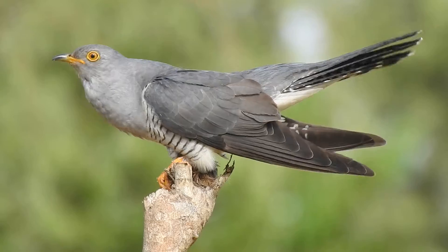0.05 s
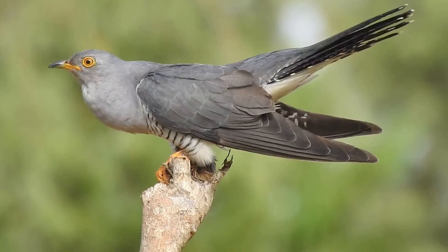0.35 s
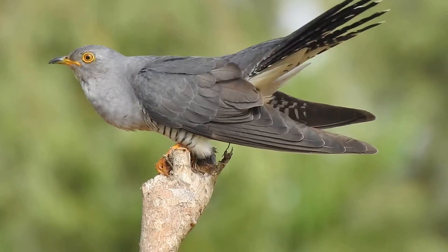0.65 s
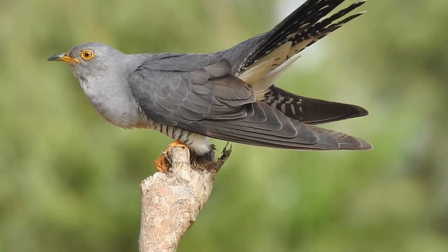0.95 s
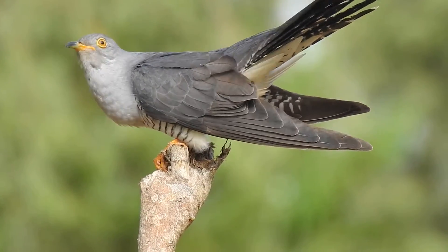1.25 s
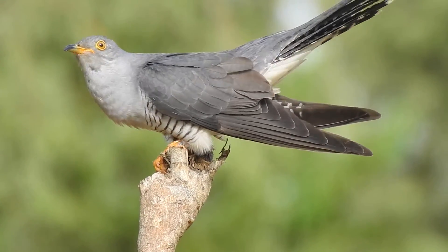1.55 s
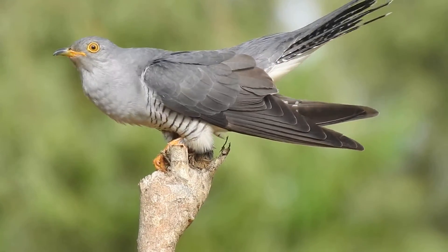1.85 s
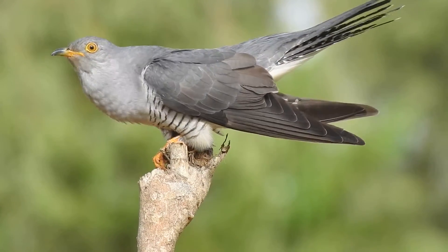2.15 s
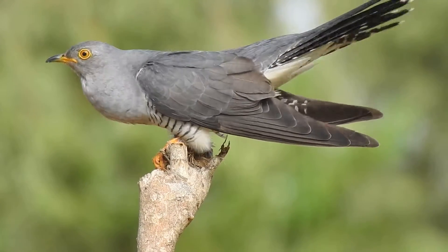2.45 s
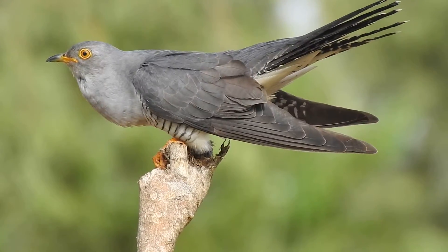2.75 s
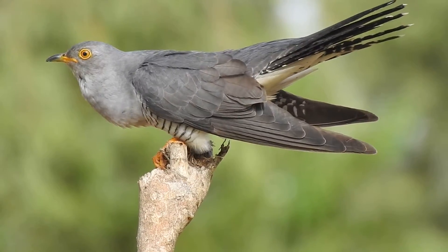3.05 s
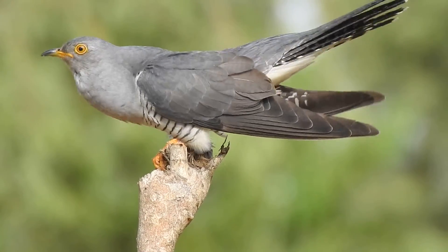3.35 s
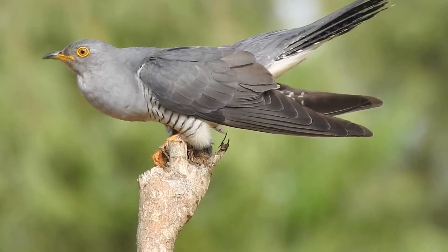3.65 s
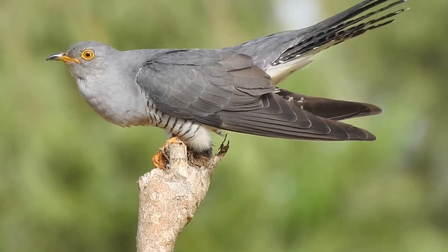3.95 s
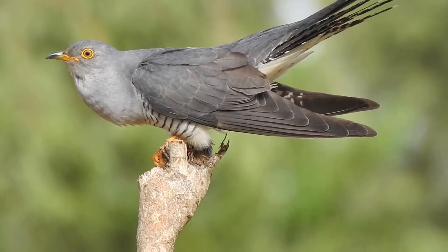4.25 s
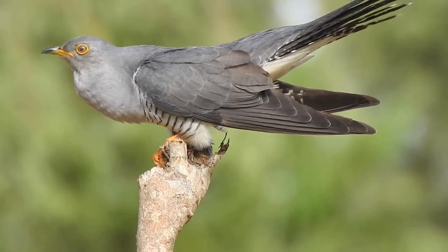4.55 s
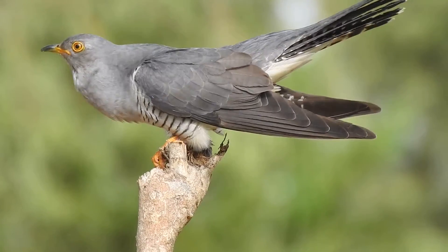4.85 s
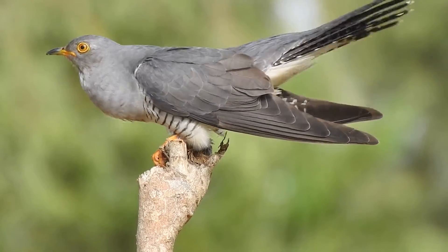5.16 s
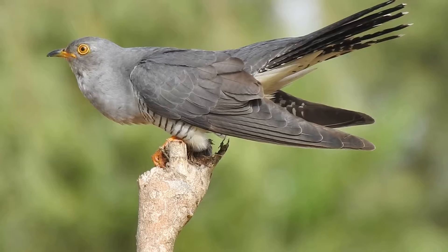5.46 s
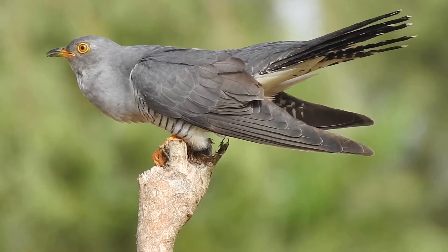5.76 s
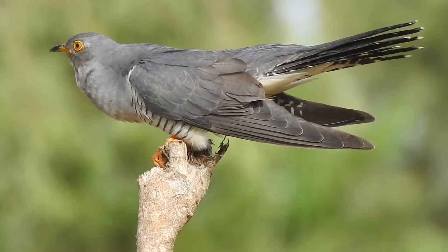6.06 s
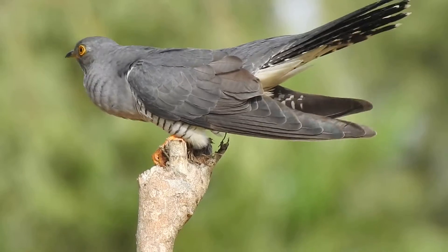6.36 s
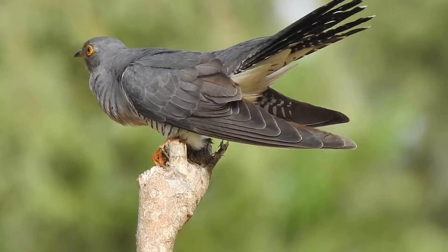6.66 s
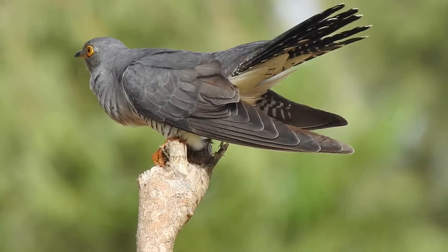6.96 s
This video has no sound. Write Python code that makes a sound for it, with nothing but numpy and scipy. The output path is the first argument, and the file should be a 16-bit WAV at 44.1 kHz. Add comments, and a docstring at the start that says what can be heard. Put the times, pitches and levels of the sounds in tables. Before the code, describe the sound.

A cuckoo calls nearby in open scrub, over a faint hiss of leaves and distant twittering. Each call is two pure, hollow notes, a short arched one and then a longer, lower one, with a light outdoor echo. The first comes right at the start, followed by a few faint fluty notes from a distant bird. Wind bumps the microphone and builds into one hard gust from about 1.5 to 2.2 seconds, with loud low rumble, a hollow rush and brief crackle. It then eases to light rumble, with another puff near 3.5 seconds. The cuckoo calls again at about 2.1, 3.4, 4.7 and 6 seconds, clear and evenly paced. Farther off, small birds give thin whistles from 2 seconds on, sharp chirps near 4, 5.2 and 6.5 seconds, and a run of soft paired cheeps from 5.5 seconds until the end, just after 7 seconds.

```python
"""Open scrub: leaves hiss, far birds twitter, and wind turbulence buffets the two microphone ports.
At 0.1 s a cuckoo calls from a stump: a short arched note, then a longer, lower one, both near sines
from the syrinx. A few fluty notes follow. At 1.5-2 s one hard gust rushes, crackles and rings the ports.
From 2 s the wind eases and the cuckoo calls four more times, echoing off the bushes, while small
birds whistle, chirp and cheep farther off."""
import sys
import numpy as np
from scipy import signal
from scipy.fft import rfft, irfft, next_fast_len
from scipy.io import wavfile
from scipy.ndimage import uniform_filter1d

SR = 44100
rng = np.random.default_rng(int(sys.argv[2]) if len(sys.argv) > 2 else 0)


def transcribe(u):
    """Save the signal u as a 16-bit wav file named by the first command-line argument.

    u: samples, shape (n,) or (channels, n), limited to [-1, 1]; the rate is SR.
    q: integer samples, one column per channel.
    """
    v = np.clip(np.atleast_2d(u).T, -1, 1)
    q = np.round(v * 32767).astype(np.int16)
    wavfile.write(sys.argv[1], SR, q)


N = 317961
TIME = np.arange(N) / SR


def from_db(db):
    return 10 ** (np.asarray(db) / 20)


def unit_rms(x):
    return x / np.sqrt(np.mean(x ** 2) + 1e-20)


def phase_of(hz):
    return 2 * np.pi * np.cumsum(hz) / SR


def lowpass(x, order, cutoff_hz):
    return signal.sosfilt(signal.butter(order, cutoff_hz, fs=SR, output="sos"), x)


def panned(x, pan_db):
    """Constant-power pan; pan_db is left minus right."""
    gains = np.array([from_db(pan_db / 2), from_db(-pan_db / 2)]).reshape(2, -1)
    return x * gains / np.sqrt(np.mean(gains ** 2, axis=0))


def drift(rate_hz):
    """Random wander below rate_hz, rms 1."""
    size = next_fast_len(N)
    rolloff = 1 + (np.fft.rfftfreq(size, 1 / SR) / rate_hz) ** 4
    return unit_rms(irfft(rfft(rng.standard_normal(size)) / rolloff, size)[:N])


def at_hz(points, hz):
    """Interpolate on a log-frequency axis."""
    freq_hz, value = np.transpose(points)
    return np.interp(np.log(np.maximum(hz, 1)), np.log(freq_hz), value)


def noise(spectrum, coherence):
    """Stereo noise, rms 1; left-right coherence is a number or a curve over frequency."""
    size = next_fast_len(N)
    hz = np.fft.rfftfreq(size, 1 / SR)
    mid, side = rfft(rng.standard_normal((2, size)))
    alike = coherence if np.isscalar(coherence) else at_hz(coherence, hz)
    stereo = np.sqrt(1 + alike) * mid + np.sqrt(1 - alike) * side * [[1], [-1]]
    return unit_rms(irfft(stereo * from_db(at_hz(spectrum, hz)), size)[:, :N])


def steadied(x, window_s=0.11):
    """Hold the running rms at 1."""
    return x / np.sqrt(uniform_filter1d(x ** 2, int(window_s * SR), axis=1))


def during(start_s, length_s):
    """Sample indices of an event and its progress, 0 to 1."""
    at = np.arange(max(int(start_s * SR), 0), min(int((start_s + length_s) * SR), N))
    return at, np.clip((at / SR - start_s) / length_s, 0, 1)


def ramp(x):
    return np.sin(np.pi / 2 * np.clip(x, 0, 1))


def bell(progress, centre, width):
    return np.exp(-((progress - centre) / width) ** 2)


def surge(start_s, attack_s, hold_s, release_s, level_db):
    """Attack-hold-release gain."""
    end_s = start_s + attack_s + hold_s + release_s
    return from_db(level_db) * (ramp((TIME - start_s) / attack_s) * ramp((end_s - TIME) / release_s)) ** 2


def arch(progress, sag, scoop, scoop_curve, top_at, sag_curve):
    """Pitch over top pitch: scoops up to 1, then sags."""
    before = np.maximum(1 - progress / top_at, 0)
    after = np.maximum((progress - top_at) / (1 - top_at), 0)
    return 1 - scoop * before ** scoop_curve - sag * after ** sag_curve


def pure_note(progress, hz, level_db):
    """Sine under a half-sine envelope."""
    return from_db(level_db) * np.sin(np.pi * progress) * np.sin(phase_of(hz))


# freq_hz, density_db
AIR_SPECTRUM = [(30, -31), (100, -21.5), (190, 4.5), (300, -3), (550, -2), (1000, -4.5), (1600, -9),
                (2100, -16), (3000, -17.5), (5000, -33), (9000, -21.5), (15500, -32.5)]
LEAF_SPECTRUM = [(2000, -8), (3200, -3.5), (4500, 0), (6300, 1.5), (7200, -2), (8500, -11.5), (11000, -24),
                 (15000, -35)]
# time_s, level_db
LEAF_LEVELS = [(0, -51.5), (1.2, -51.5), (2.4, -53.5), (4.6, -54.5), (7.2, -54)]
# freq_hz, coherence
AMBIENT_COHERENCE = [(40, .5), (130, 1), (640, 0.81), (3100, 0.51), (6500, 0.39), (9000, 0.01), (15000, .1)]


def air_and_leaves(air_db):
    """Steady low air noise and the hiss of leaves in the breeze."""
    air = from_db(air_db) * noise(AIR_SPECTRUM, AMBIENT_COHERENCE)
    leaves_db = np.interp(TIME, *np.transpose(LEAF_LEVELS))
    return air + from_db(leaves_db) * noise(LEAF_SPECTRUM, AMBIENT_COHERENCE)


def scrub_scatter(x, t60_s, cutoff_hz):
    """Diffuse reflections from trees, different per channel, flattened so no pitch rings."""
    age_s = np.arange(SR) / SR
    decay = from_db(-60 * age_s / t60_s) * (1 - np.exp(-age_s / 0.0038))
    flat_spectrum = np.exp(1j * np.angle(rfft(rng.standard_normal((2, SR)) * decay)))
    tail = np.sqrt(decay) * irfft(flat_spectrum, SR)
    tail = lowpass(tail + tail.mean(axis=0), 1, cutoff_hz)
    return signal.fftconvolve(x[None], tail / np.sqrt(np.sum(tail ** 2) / 2), axes=1)[:, :N]


def far_chorus(level_db, count):
    """Many far birds: short falling slurs at random times and pitches."""
    out = np.zeros(N)
    for when, span, height, slide, softness in rng.random((count, 5)):
        at, progress = during(when * (N / SR - 0.1), 0.067 * (1 + span))
        hz = 3900 * 1.5 ** height * (1 - 0.4 * slide * progress)
        out[at] += pure_note(progress, hz, level_db - 2.7 * softness)
    return out


# start_s, length_s, rumble_db, pan_db, thud_db
PORT_GUSTS = [(0.042, 0.31, -53, 10, -40), (0.598, 0.18, -41, -13, -42.5), (0.769, 0.53, -33, -12, -49.5),
              (1.39, 0.3, -29.5, -1.5, -52), (1.593, 0.28, -19, -0.5, -34), (1.844, .21, -24.5, -3, -39),
              (2.04, 0.13, -32.5, 6, -50), (2.134, .115, -23.5, 1, -37.5), (2.47, 0.42, -41, -5, -51),
              (3.413, 0.17, -31.5, -4, -43), (4.271, .2, -50, 8, -53), (6.075, 0.37, -46.5, -2, -52),
              (6.573, 0.18, -47, 1, -53)]


def airflow(light_rumble_db, light_thud_db, easing_db_per_s):
    """Gusts over easing light air. Returns the flow (rumble gain per port) and the thud gain."""
    easing_db = -easing_db_per_s * TIME
    rumble_power = from_db(light_rumble_db + easing_db) ** 2 * np.ones((2, 1))
    thud_power = from_db(light_thud_db + easing_db) ** 2
    for start_s, length_s, rumble_db, pan_db, thud_db in PORT_GUSTS:
        at, progress = during(start_s, length_s)
        hump = np.sin(np.pi * progress)
        rumble_power[:, at] += panned(from_db(rumble_db) * hump, pan_db) ** 2
        thud_power[at] += (from_db(thud_db) * hump) ** 2
    return np.sqrt(rumble_power), np.sqrt(thud_power)


# freq_hz, density_db
RUMBLE_SPECTRUM = [(30, -43), (90, -10), (125, -1.5), (185, 1.5), (235, -4), (290, -8.5), (350, -10.5),
                   (450, -13.5), (800, -31.5), (1500, -38), (4000, -75), (15000, -98.5)]
THUD_SPECTRUM = [(20, -25.5), (60, 2.5), (120, -2), (220, 1.5), (600, -64.5), (5000, -100)]


def turbulence(flow, thud_gain, uneven_db):
    """Turbulence at the ports: rumble that grows with the flow, and soft deep thuds."""
    rumble = steadied(noise(RUMBLE_SPECTRUM, coherence=0.25)) * flow
    thuds = steadied(noise(THUD_SPECTRUM, coherence=0.72)) * thud_gain
    return rumble + thuds * from_db(uneven_db * drift(21))


# freq_hz, density_db
RUSH_SPECTRUM = [(250, -13), (420, 10.5), (650, 1.5), (900, -7), (1400, -36), (3500, -45), (6000, -63),
                 (15000, -65)]
PORT_RING_SPECTRUM = [(120, -47), (165, -13), (185, 3.5), (228, 2), (255, -10), (400, -47), (3000, -110)]


def hard_gust(lumpy_db):
    """A lumpy rush across the right port, then a hollow ring in both."""
    lumps = from_db(lumpy_db * np.tanh([drift(75), drift(108)]))
    rush = unit_rms(noise(RUSH_SPECTRUM, coherence=0.13) * lumps)
    rush *= surge(start_s=1.466, attack_s=0.12, hold_s=0.16, release_s=0.11, level_db=-26)
    ring = steadied(noise(PORT_RING_SPECTRUM, coherence=0.11))
    ring *= surge(start_s=1.632, attack_s=0.021, hold_s=0.16, release_s=0.03, level_db=-17)
    return panned(rush, pan_db=-15) + ring


def stray_eddies(flow, count, above_flow_db=1.5, low_hz=120, high_hz=383, pan_spread_db=7.5):
    """Rows of random eddies; level and side follow the flow."""
    rows = []
    for when, height, side in rng.random((count, 3)):
        left_db, right_db = 20 * np.log10(flow[:, int(when * N)])
        peak_db = max(left_db, right_db) + above_flow_db
        pan_db = left_db - right_db + pan_spread_db * (2 * side - 1)
        rows.append((when * N / SR, peak_db, pan_db, low_hz * (high_hz / low_hz) ** height))
    return rows


# start_s, peak_db, pan_db, pitch_hz
STRONG_EDDIES = [(.091, -28.5, -11, 158), (.706, -27.5, 11, 172), (.825, -19.5, -26, 296),
                 (.96, -19.5, -27, 316), (1.084, -25.5, -24, 283), (1.139, -23, -25, 452),
                 (1.216, -18.5, -33, 320), (1.479, -21, -9, 283), (1.585, -16.5, -23, 535),
                 (1.68, -12.5, -19, 558), (1.751, -13.5, 7, 300), (1.812, -16.5, -26, 684),
                 (1.89, -24, 6, 426), (1.929, -16.5, 12, 146), (1.998, -10.5, 4.5, 145),
                 (2.153, -19, -19, 350), (2.198, -17, 1, 150), (2.44, -30, -20, 200), (2.547, -28, 8, 116),
                 (2.745, -23.5, -23, 184), (2.928, -28.5, -27, 187), (3.494, -21, 4, 142.5),
                 (3.933, -29.5, -32, 160.5), (4.789, -29.5, 18, 252)]


def eddies(flow, cycles):
    """Each eddy shakes the air in a port for a few cycles."""
    out = np.zeros((2, N))
    for start_s, peak_db, pan_db, pitch_hz in STRONG_EDDIES + stray_eddies(flow, count=70):
        at, progress = during(start_s - 0.004, cycles / pitch_hz)
        envelope = from_db(peak_db) * np.sin(np.pi * progress ** 0.64) ** 2
        out[:, at] += panned(envelope * np.sin(2 * np.pi * (cycles * progress + rng.random())), pan_db)
    return out


# start_s, impulse_db, pan_db
SHARP_TICKS = [(1.7259, -34, 13), (1.736, -32.5, -13), (1.7469, -32.5, -14), (1.9918, -37, -2),
               (2.0127, -34.5, -3), (2.1518, -38.5, -9), (2.226, -39, 10)]


def port_ticks(flow, peak_rate_per_s, crackle_db, makeup_db):
    """Pressure steps at the ports: dull clicks, a few timed, the rest random and following the flow."""
    strength = flow / flow.max()
    fires = rng.random((2, N)) < peak_rate_per_s / 2 * strength / SR
    impulses = fires * np.sqrt(strength) * from_db(crackle_db) * rng.choice([-1, 1], N) + 1e-18
    signs = rng.choice([-1, 1], len(SHARP_TICKS))
    for (start_s, impulse_db, pan_db), sign in zip(SHARP_TICKS, signs):
        impulses[:, int((start_s + 0.001) * SR)] += panned(sign * from_db(impulse_db), pan_db)[:, 0]
    dulled = lowpass(impulses, order=1, cutoff_hz=905)
    return from_db(makeup_db) * lowpass(dulled, order=6, cutoff_hz=4140)


def gust_snaps(rate_per_s):
    """Fine bright crackle at the peak of the hard gust."""
    snaps = (rng.random((2, N)) < rate_per_s / SR) * rng.standard_normal((2, N))
    return snaps * surge(start_s=1.71, attack_s=0.025, hold_s=0.035, release_s=0.04, level_db=-47)


def chirp_syllables(rows, end_ratio, jitter, brighten_db, rough_db=4):
    """Falling harmonic stacks; the throat passes 3-7 kHz and each partial flutters on its own."""
    # freq_hz, gain_db
    throat = [(1800, -23.5), (2700, -10), (3400, -0.5), (4100, 2.5), (4900, 2), (5700, -11.5),
              (6700, -14), (7800, -45), (10000, -69)]
    out, waver = np.zeros(N), 1 + jitter * drift(420)
    flutters = {k: from_db(rough_db * drift(99)) for k in range(2, 9)}
    for start_s, length_s, from_hz, level_db, tilt_db_per_octave in rows:
        at, progress = during(start_s, length_s)
        hz = from_hz * end_ratio ** progress * waver[at]
        tilt = tilt_db_per_octave + brighten_db * (progress - 0.5)
        for k, flutter in flutters.items():
            octaves = np.clip(np.log2(k * hz / 4500), -0.5, 0.5)
            partial_db = level_db + at_hz(throat, k * hz) + tilt * octaves
            out[at] += flutter[at] * pure_note(progress, k * hz, partial_db)
    return out


# start_s, gap_s, pitch_hz, level_db
FAR_CHEEPS = [(1.385, 0.039, 910, -59), (3.64, 0.042, 950, -60), (5.495, 0.036, 924, -57.5),
              (5.76, 0.037, 964, -55.5), (5.96, 0.031, 926, -55.5), (6.15, .028, 940, -54.5),
              (6.646, .038, 1002, -49.5), (6.85, 0.042, 944, -51), (7.066, 0.036, 963, -49)]


def cheeps(length_s, tilt_db_per_octave):
    """A farther bird: pairs of low, bright syllables, the first softer."""
    first = [(s, length_s, hz, db - 3, tilt_db_per_octave) for s, _, hz, db in FAR_CHEEPS]
    second = [(s + gap_s, length_s, hz, db, tilt_db_per_octave) for s, gap_s, hz, db in FAR_CHEEPS]
    return chirp_syllables(first + second, end_ratio=0.84, jitter=0.009, brighten_db=-1)


# start_s, length_s, from_hz, level_db, tilt_db_per_octave
SHARP_CHIRPS = [(3.126, .08, 1710, -56, 5), (3.402, 0.075, 1690, -59, 7), (3.953, 0.077, 2143, -38.5, 17),
                (4.648, 0.11, 1600, -60.5, 11), (5.233, .088, 2000, -40, 3),
                (6.509, 0.078, 1976, -38.5, -1.5)]


def chirps():
    """A small bird's sharp chirps, brightening as they fall."""
    return chirp_syllables(SHARP_CHIRPS, end_ratio=0.71, jitter=0.02, brighten_db=11)


# start_s, level_db
WHISTLER_CALLS = [(2.051, -58), (3.189, -52.5), (4.288, -53), (5.459, -58)]
# start_s, length_s, top_hz, sag_fraction, level_db
FLUTY_NOTES = [(0.564, 0.052, 2026, .2, -53.5), (.82, 0.093, 1840, .1, -46.5), (0.877, .19, 1955, .34, -49)]


def whistles(jitter, flicker_db):
    """Pure notes of distant birds, wavering on their way through the air."""
    out, waver = np.zeros(N), 1 + jitter * drift(80)

    def glide(start_s, level_db, length_s, from_hz, to_hz):
        at, progress = during(start_s, length_s)
        out[at] += pure_note(progress, from_hz * (to_hz / from_hz) ** progress * waver[at], level_db)

    for start_s, level_db in WHISTLER_CALLS:  # pip, then slur
        glide(start_s, level_db, length_s=0.075, from_hz=2530, to_hz=2530)
        glide(start_s + 0.078, level_db - 5.5, length_s=0.29, from_hz=2510, to_hz=2309.2)
    for start_s, _, _, level_db, _ in SHARP_CHIRPS:  # lead-in to each chirp
        glide(start_s - 0.042, level_db - 9, length_s=0.057, from_hz=3220, to_hz=2970)
    for start_s, length_s, top_hz, sag, level_db in FLUTY_NOTES:
        at, progress = during(start_s, length_s)
        hz = top_hz * arch(progress, sag, scoop=0.118, scoop_curve=2, top_at=0.24, sag_curve=1.35)
        out[at] += pure_note(progress, hz * waver[at], level_db)
    return out * from_db(flicker_db * drift(28))


# delay_s, gain_db, pan_db
BUSH_ECHOES = [(.021, -39, -13), (.047, -50, 11.5), (.083, -29, 0)]


def bush_echoes(x):
    """Distinct reflections from nearby bushes."""
    return sum(panned(from_db(gain_db) * np.interp(TIME - delay_s, TIME, x, left=0), pan_db)
               for delay_s, gain_db, pan_db in BUSH_ECHOES)


def note_gain(progress, attack, attack_curve, release, release_curve, dip_at, dip_width, dip_db):
    """A note swells, dips briefly and is shut off; times are fractions of its length."""
    gate = ramp(progress / attack) ** attack_curve * ramp((1 - progress) / release) ** release_curve
    crescendo_db = 2.5 * (progress - 0.5)
    return gate * from_db(crescendo_db - dip_db * bell(progress, dip_at, dip_width))


# freq_hz, density_db
THROAT_RASP_SPECTRUM = [(1200, -10.5), (2400, -2), (3200, 5), (4000, -10.5), (4700, 7.5), (5600, -8.5),
                        (7000, -13), (9000, -18), (14000, -41)]


def syrinx(notes, overtones, pitch_shape, gain_shape, strain_at, jitter, whistle_db, whistle_hz=7900):
    """A near sine; mid-note strain adds faint overtones, a thin whistle and a pulsed rasp."""
    out, waver, shimmer = np.zeros(N), 1 + jitter * drift(70), from_db(0.077 * drift(34))
    rasp = noise(THROAT_RASP_SPECTRUM, coherence=0.9)[0]
    whistle = from_db(whistle_db) * drift(120) * np.sin(2 * np.pi * whistle_hz * TIME)
    for start_s, length_s, top_hz, sag, level_db, rasp_db in notes:
        at, progress = during(start_s, length_s)
        strain = bell(progress, strain_at, width=0.22)
        phase = phase_of(top_hz * arch(progress, sag, **pitch_shape) * waver[at])
        tone = note_gain(progress, **gain_shape) * shimmer[at] * np.sin(phase)
        edge = sum(from_db(db) * np.sin(k * phase) for k, db in overtones) + whistle[at]
        out[at] += from_db(level_db) * (tone + strain * edge)
        out[at] += from_db(rasp_db) * strain * rasp[at] * (1 + np.sin(phase))
    return out


# start_s, length_s, top_hz, sag_fraction, level_db, rasp_db
CU_NOTES = [(.123, 0.11, 629, 0.099, -26.5, -55), (2.062, 0.13, 640, 0.18, -22.5, -53),
            (3.427, 0.13, 655.5, 0.25, -22, -58), (4.735, .13, 657.5, 0.23, -21, -50.5),
            (6.014, 0.13, 656, 0.24, -21.5, -71)]
COO_NOTES = [(.437, 0.22, 532.3, 0.053, -21, -76), (2.401, 0.19, 546, 0.064, -19.5, -67),
             (3.774, .18, 553, 0.072, -19.5, -68), (5.086, 0.1818, 555.3, 0.09, -19, -58),
             (6.367, 0.18, 550, 0.072, -20.5, -60)]
# harmonic_number, relative_db
CU_HARMONICS = [(2, -31.5), (4, -39), (5, -42.5), (6, -47.5), (7, -38.5), (8, -50)]
COO_HARMONICS = [(3, -38), (4, -38), (5, -52.5), (6, -41), (7, -41), (8, -39.5)]


def cuckoo():
    """Five calls: a short arched "cu", then a longer, lower "coo"."""
    cu = syrinx(CU_NOTES, CU_HARMONICS, strain_at=0.63, jitter=0.0065, whistle_db=-38.5,
                pitch_shape=dict(scoop=0.29, scoop_curve=1.45, top_at=0.64, sag_curve=1.25),
                gain_shape=dict(attack=0.65, attack_curve=1.35, release=0.3, release_curve=2.6,
                                dip_at=0.3, dip_width=0.092, dip_db=3))
    coo = syrinx(COO_NOTES, COO_HARMONICS, strain_at=0.49, jitter=0.002, whistle_db=-60,
                 pitch_shape=dict(scoop=0.22, scoop_curve=2.3, top_at=0.31, sag_curve=1.8),
                 gain_shape=dict(attack=0.33, attack_curve=1.42, release=0.11, release_curve=2.9,
                                 dip_at=0.44, dip_width=0.086, dip_db=1))
    return cu + coo


def scene():
    """Cuckoo near, small birds far, leaves all round, wind on the microphone."""
    calls = cuckoo()
    near = panned(calls, pan_db=-0.13) + bush_echoes(calls)
    near += from_db(-35.5) * scrub_scatter(calls, t60_s=1.9, cutoff_hz=1800)
    song = chirps() + cheeps(length_s=0.064, tilt_db_per_octave=15.5)
    song += whistles(jitter=0.0035, flicker_db=3)
    far = panned(song, pan_db=1.5) + from_db(-8.5) * scrub_scatter(song, t60_s=0.51, cutoff_hz=7040)
    far += scrub_scatter(far_chorus(level_db=-61.5, count=60), t60_s=0.17, cutoff_hz=7000)
    background = air_and_leaves(air_db=-51.5)
    flow, thud_gain = airflow(light_rumble_db=-45, light_thud_db=-52.5, easing_db_per_s=1.16)
    wind = turbulence(flow, thud_gain, uneven_db=3) + hard_gust(lumpy_db=13.5)
    wind += eddies(flow, cycles=4.35)
    wind += port_ticks(flow, peak_rate_per_s=36, crackle_db=-32.5, makeup_db=32.5)
    wind += gust_snaps(rate_per_s=1100)
    return background + wind + far + near


def record(dry):
    """The microphone opens after a moment; a steep low-pass cuts the top."""
    open_s, fade_s, cutoff_hz = 0.078, 0.012, 15700
    opened = np.clip((TIME - open_s) / fade_s, 0.01, 1)
    return signal.sosfilt(signal.ellip(14, 0.1, 90, cutoff_hz, fs=SR, output="sos"), dry * opened)


dry = scene()
out = record(dry)
transcribe(out)
```